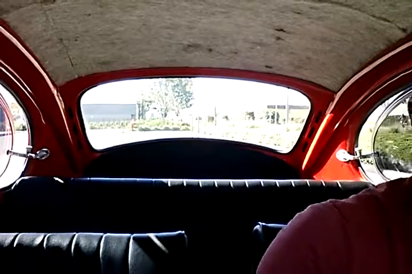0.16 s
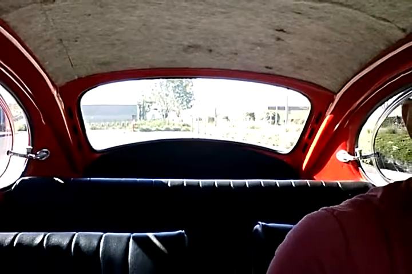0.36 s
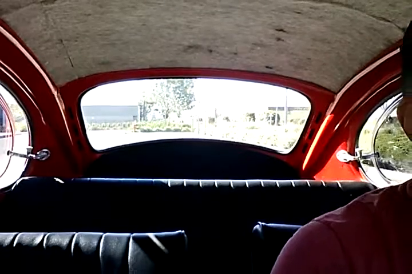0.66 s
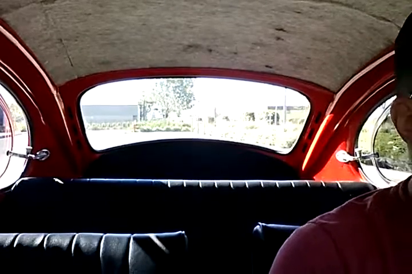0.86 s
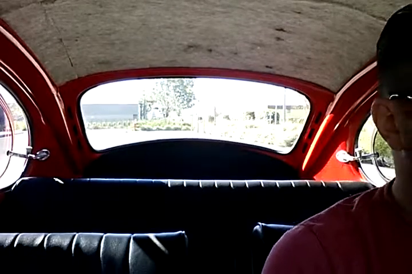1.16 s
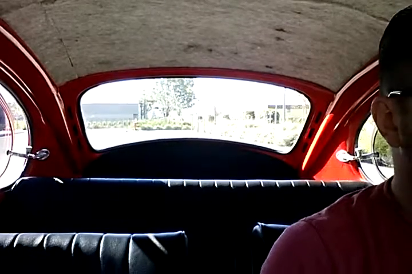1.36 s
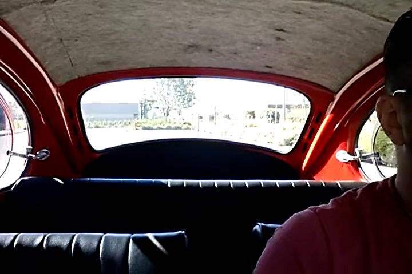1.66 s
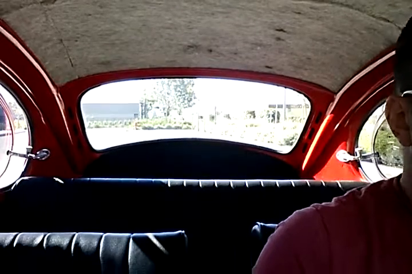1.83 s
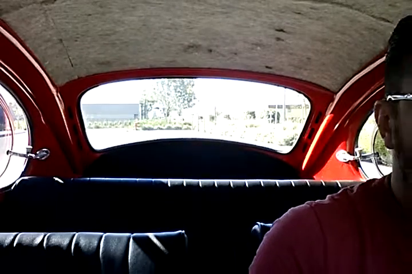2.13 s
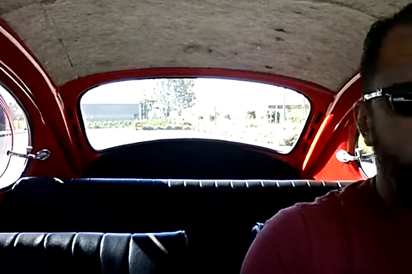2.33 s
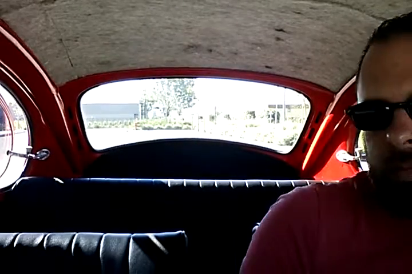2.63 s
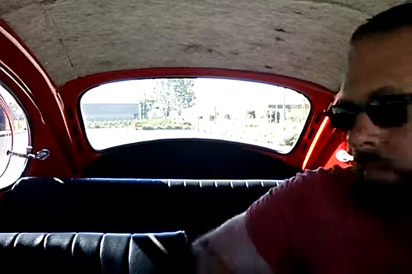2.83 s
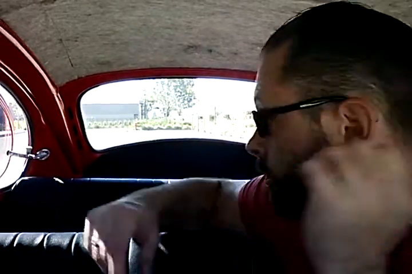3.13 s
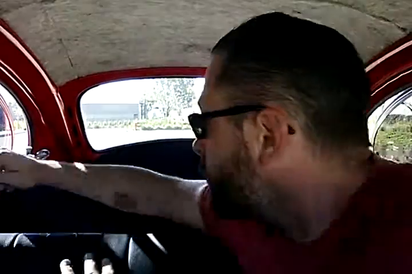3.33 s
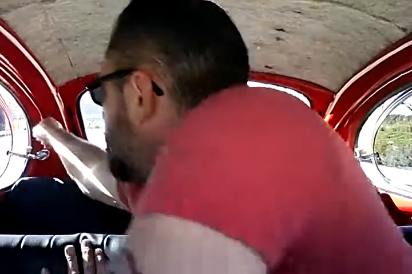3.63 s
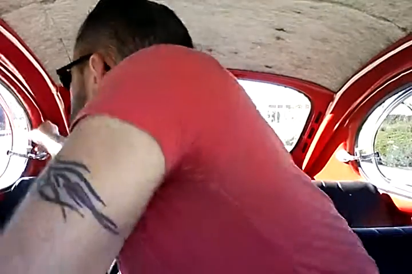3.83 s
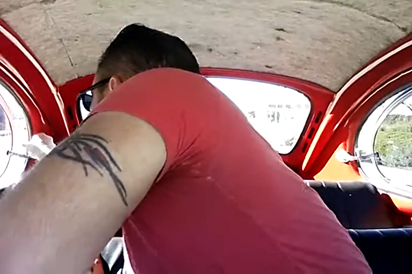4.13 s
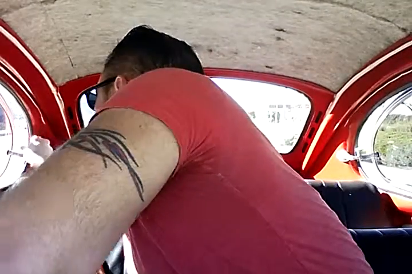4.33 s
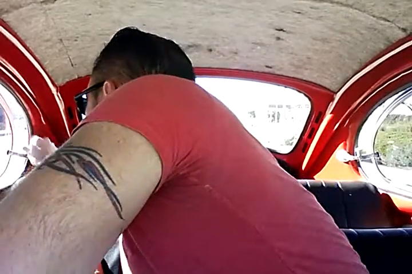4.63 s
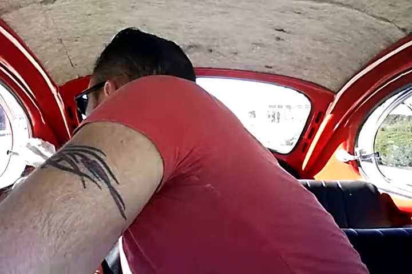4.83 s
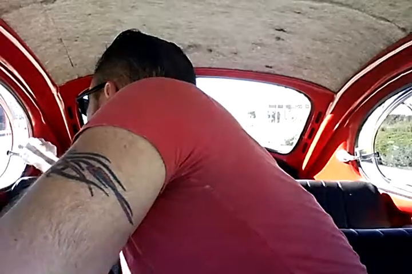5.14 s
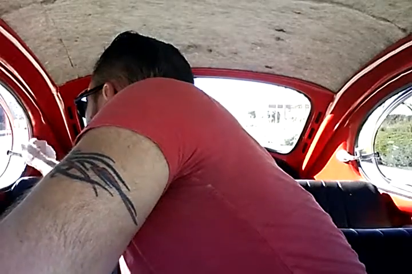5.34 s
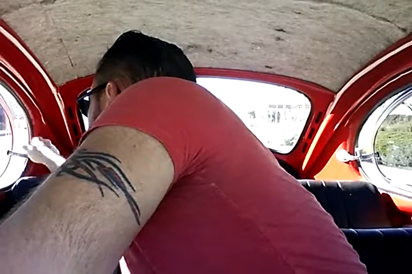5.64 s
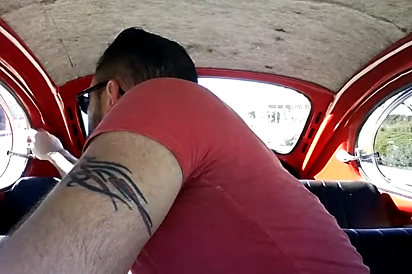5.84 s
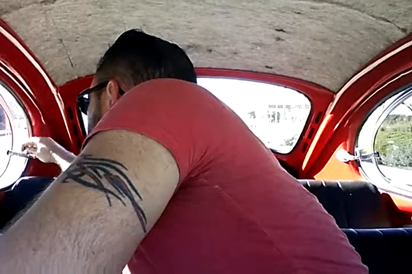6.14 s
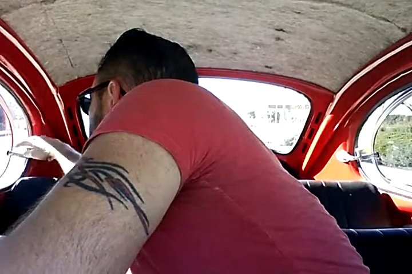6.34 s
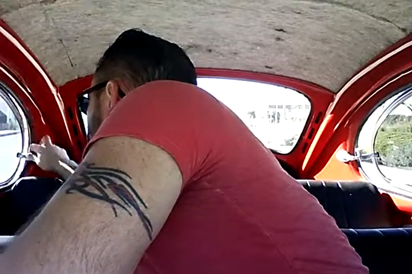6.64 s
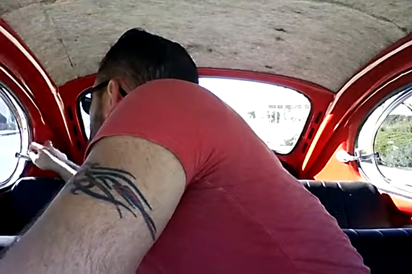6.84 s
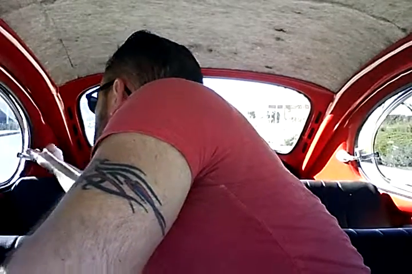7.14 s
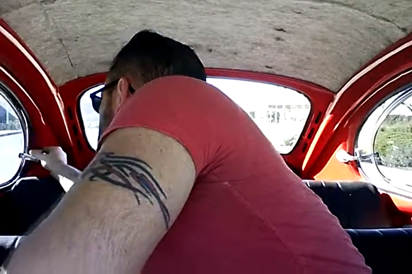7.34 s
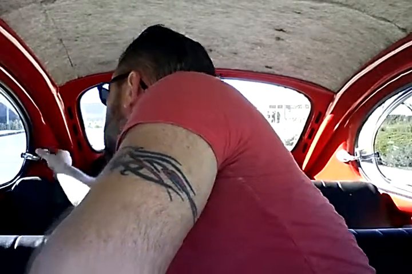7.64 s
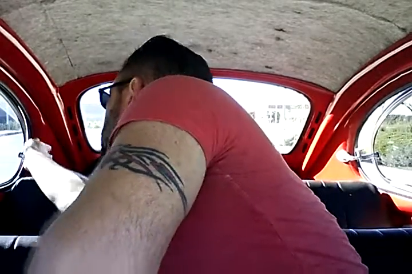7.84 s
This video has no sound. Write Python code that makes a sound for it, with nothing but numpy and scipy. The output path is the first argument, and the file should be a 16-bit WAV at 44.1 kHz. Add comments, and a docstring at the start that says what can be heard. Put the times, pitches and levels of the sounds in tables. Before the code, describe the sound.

Heard from the front seats of a small old car, an air-cooled engine idles slowly and unevenly behind, booming with clatter and tinny rattle. A seat belt clinks lightly, then jangles as the occupant twists around; vinyl squeaks and crunches, cloth hisses, and heavy blows hit the seat back. Finally a stiff rear window catch grinds, knocks and snaps.

```python
"""From the front seats of an old car with its engine idling: an air-cooled flat-four turns slowly behind the cabin,
its uneven firings filtered into a boom, with shaped noise for clatter, tin rattle and panel drone over faint hiss.
Fine treble hiss swells now and again, most at 2.6 to 3.4 s. A seat belt clinks from 0.7 s, in noise bursts rung
through steel; from 2 s come squeaks of gliding sines, crunching vinyl and seat-back blows of decaying sines.
From 5 s the stiff latch of a rear side window grinds and snaps, with knocks in the panel and pane."""
import sys
import numpy as np
from scipy import signal
from scipy.fft import rfft, irfft
from scipy.io import wavfile
from scipy.ndimage import uniform_filter1d, map_coordinates

SR = 44100
rng = np.random.default_rng(int(sys.argv[2]) if len(sys.argv) > 2 else 0)


def transcribe(signal):
    """Save signal, clipped to [-1, 1], as a 16-bit WAV file at the path in sys.argv[1]."""
    frames = np.atleast_2d(signal).T
    limited = np.clip(frames, -1, 1)
    pcm = np.round(limited * 32767).astype(np.int16)
    wavfile.write(sys.argv[1], SR, pcm)


N = 351918
TIME = np.arange(N) / SR

# Colour of steel clinking. Each row: frequency in Hz, relative level in dB.
CLINK_COLOUR = [(2650, -15), (4500, 0), (4770, 1), (5560, 3), (6770, 3.5), (8550, 3.5), (10800, 2),
                (12700, -2), (15100, -4.5), (16000, -6.5)]
# Colour of the duller clack of fittings. Each row: frequency in Hz, relative level in dB.
CLACK_COLOUR = [(200, -57.5), (500, -17.5), (850, 8.5), (1200, -3.5), (1700, 9), (2300, 6), (3200, 10),
                (4000, 0), (5000, -10.5), (7000, -21.5), (16000, -65)]
# Colour of crunching vinyl. Each row: frequency in Hz, relative level in dB.
CRUNCH_COLOUR = [(300, -25), (600, -18), (950, 8), (1400, 4.5), (2000, -1), (3200, -2.5), (4200, -4),
                 (7000, -43), (16000, -79)]
# Colour of the treble hiss, steady and swelling. Each row: frequency in Hz, relative level in dB.
HISS_COLOUR = [(2650, -55.5), (4500, -16.5), (5530, -8.5), (7260, -0.5), (8690, -0.5), (12900, 2),
               (14900, 2.5), (16000, -8.5)]
# Resonances of the cabin and its panels. Each row: centre in Hz, width in Hz, lift in dB.
CABIN_MODES = [(126, 12.9, 2), (159, 20, 3.5), (282.9, 9, 11), (409.4, 10, -1), (530.2, 27, 8.5),
               (695.3, 35, 8.5), (810, 23, 9), (979, 12, 6.5), (1200, 40, 3.5), (2220, 51, 11.5),
               (2473, 77, 5.5)]
# Resonances of the small steel fittings. Each row: centre in Hz, width in Hz, lift in dB.
STEEL_MODES = [(1200, 210, 11.5), (1598, 160, 5.5), (2700, 81, 6), (2910, 69, 7.5), (3344, 71, 2.5),
               (3786, 250, 6), (5570, 630, 1.5), (7359, 87, 0.5), (8550, 190, 2.5), (11680, 400, 3)]


def undb(db):
    """Decibels to gain."""
    return 10 ** (np.asarray(db) / 20)


def unit(x):
    """Scale to rms 1."""
    return x / np.sqrt(np.mean(x ** 2))


def curve(rows):
    """The second column of a table against time, joined by straight lines."""
    seconds, values = np.transpose(rows)
    return np.interp(TIME, seconds, values)


def noise():
    """White noise of rms 1."""
    return rng.standard_normal(N)


def walk(rate, size=N):
    """Smooth random drift of rms 1 that changes about rate times a second."""
    hold = max(int(SR / rate), 1)
    steps = np.repeat(rng.standard_normal(size // hold + 1), hold)
    return unit(uniform_filter1d(steps, hold)[:size])


def fade(age, t60):
    """Exponential decay by 60 dB in t60, in the unit of age."""
    return np.exp(-np.log(1000) * age / t60)


def body(x, spectrum, modes=(), size=8192):
    """Ring x through a causal response of unit energy: a broad spectrum with resonances on it."""
    f = np.arange(size // 2 + 1) * SR / size + 1
    hz, db = np.transpose(spectrum)
    db = np.interp(np.log(f), np.log(hz), db)
    for centre, width, lift_db in modes:
        db = db + lift_db / (1 + (2 * (f - centre) / width) ** 2)
    # the folded cepstrum gives minimum phase: the ring starts at once
    cepstrum = irfft(np.log(undb(db)))[:size // 2]
    cepstrum[0] = 0
    response = irfft(np.exp(rfft(2 * cepstrum, size)))
    return signal.fftconvolve(x, response / np.linalg.norm(response))[:len(x)]


def patchy(x, depth_db, rate, width_hz, size=512):
    """Parts ring in turn: each narrow band of x swells and fades on its own, about rate times a second."""
    overlap = size - size // 4
    f, t, bands = signal.stft(x, SR, nperseg=size, noverlap=overlap)
    chance = rng.standard_normal((int(f[-1] / width_hz) + 2, int(t[-1] * rate) + 2))
    grid = np.meshgrid(f / width_hz, t * rate, indexing="ij")
    swell = unit(map_coordinates(chance, grid, order=1))
    _, mixed = signal.istft(bands * undb(depth_db * swell), SR, nperseg=size, noverlap=overlap)
    return unit(mixed[:len(x)])


def strikes(times, levels_db, spectrum, modes, rise, t60, tail_db, tail_t60, crack=0.24, chatter_db=3):
    """Each contact cracks, chatters briefly, favours its own resonances and leaves dense reflections in the cabin."""
    out, age = np.zeros(2 * N), TIME[:SR // 3]
    decay = fade(age, t60) + undb(tail_db) * fade(age, tail_t60)
    shape = (1 - np.exp(-age / rise)) * decay
    shape = shape / shape.max() * (1 + crack * fade(age, 0.0028))
    for s, db in zip(times, levels_db):
        force = patchy(rng.standard_normal(len(age)), depth_db=3.2, rate=35, width_hz=220)
        force = unit(force * undb(chatter_db * walk(700, size=len(age))))
        start = int(s * SR)
        out[start:start + len(age)] += undb(db) * body(force * shape, spectrum, modes, size=4096)
    return out[:N]


def swells(rows, attack_share, slope_db_per_s, release_t60, tail_db, tail_t60):
    """Gain of drawn-out sounds: each rises, gains or loses level steadily, stops and leaves a faint tail."""
    power, age = np.zeros(2 * N), TIME[:2 * SR]
    for s, length, db in rows:
        start = int(s * SR)
        after = np.maximum(age - length, 0)
        attack = np.minimum(age / (attack_share * length), 1)
        hold = attack * undb(db + slope_db_per_s * (age - after))
        release = fade(after, release_t60) + undb(tail_db) * fade(after, tail_t60)
        power[start:start + len(age)] += (hold * release) ** 2
    return np.sqrt(power[:N])


def reflections(x, wet_db, t60):
    """Add the short, dense echo of the glass and steel shell."""
    tail = (noise() * fade(TIME, t60))[:SR // 3]
    return x + undb(wet_db) * signal.fftconvolve(x, tail / np.linalg.norm(tail))[:N]


def hiss(level_db=-80.5):
    """A faint, even hiss in the treble: steady filtered noise."""
    return body(noise(), HISS_COLOUR) * undb(level_db)


def firing_pulses(firings, scatter_db=3.0, misfire_db=-13.5):
    """One impulse a firing, with each cylinder's own strength, random scatter and stumbles."""
    # Each cylinder's strength in firing order, in dB before scatter.
    cylinder_db = np.array([1.5, -18, 3.5, -18.5])
    # The engine stumbles at the firings nearest these times, in seconds.
    misfires = [0.13, 0.66, 2.03, 2.18, 2.33, 3.54, 4.38, 5.14, 5.68, 6.75, 6.9, 7.28, 7.44, 7.51]
    count = firings.astype(int)
    at = np.flatnonzero(np.diff(count)) + 1
    strength_db = cylinder_db[count[at] % len(cylinder_db)]
    pulses = np.zeros(N)
    pulses[at] = undb(strength_db + scatter_db * rng.standard_normal(len(at)))
    for s in misfires:
        pulses[at[np.argmin(np.abs(at / SR - s))]] *= undb(misfire_db)
    return pulses


def engine(boom_trim_db=-1, clatter_trim_db=3.0, rattle_trim_db=1.0, drone_trim_db=1, shake_db=0.5, puff=0.27):
    """Two firings a turn, strong and weak in turn, boom in the shell; noise shaken with them excites the panels."""
    # Engine speed. Each row: time in seconds, crank turns per second.
    crank = [(0, 13.35), (1, 13.17), (3.5, 13.17), (4.8, 13.09), (7, 13.1), (8, 12.85)]
    # Course of boom, clatter, rattling tin and panel drone. Each row: time in seconds, level in dB before trim.
    boom_level, clatter_level = [(0, -34), (0.6, -33.5), (1.7, -30), (2.5, -32), (3.1, -31), (4.1, -30.5),
                                 (4.5, -35.5), (5.5, -30), (6.5, -27.5), (7.0, -33), (7.98, -29)], [(0.0, -37), (0.4, -36), (1.2, -37), (1.78, -34.5),
                                               (2.51, -41), (2.82, -34), (3.09, -40.5), (3.33, -33),
                                               (3.78, -40.5), (4.29, -41.5), (5.31, -35), (5.8, -33),
                                               (6.15, -35.5), (6.74, -39), (7.69, -39.5), (7.98, -38.5)]
    rattle_level, drone_level = [(0.0, -53.5), (0.82, -54), (1.24, -49), (2.22, -48.5), (2.36, -63),
                                 (2.62, -45.5), (2.8, -48), (3.02, -56), (3.44, -48), (4.42, -58),
                                 (5.67, -48), (6.24, -53.5), (6.51, -56), (6.87, -56), (7.56, -56),
                                 (7.98, -52)], [(0.0, -69), (1.2, -54), (2.27, -58.5), (2.98, -41.5),
                                                       (3.35, -45.5), (3.89, -56), (4.44, -58), (4.98, -43),
                                                       (6.0, -36.5), (6.29, -53), (6.87, -33),
                                                       (7.98, -44.5)]
    # Colours of the same four layers. Each row: frequency in Hz, relative level in dB.
    boom_colour, clatter_colour = [(12, -59), (28, -33), (40, -9.5), (52, 0.5), (64, 3.5), (80, 8.5),
                                   (95, -5), (116, -25), (160, -20.5), (230, -33.5), (400, -58.5),
                                   (2000, -120)], [(20, -27), (45, -11), (62, 4.5), (85, 3), (110, 1),
                                                    (170, 2), (300, -4), (510, -6.5), (600, -13),
                                                    (1000, -14.5), (1250, -18.5), (1400, -41),
                                                    (2500, -55.5), (5000, -43.5), (9000, -75.5)]
    rattle_colour, drone_colour = [(500, -64), (1250, 8), (1600, 4), (2500, 2.5), (3800, -4.5),
                                   (4600, -20.5), (5800, -18), (7300, -29.5), (10000, -53.5),
                                   (16000, -64.5)], [(150, -38), (310, -13.5), (388, 0.5), (460, -13.5),
                                                   (800, -40.5), (3000, -100)]

    firings = 2 * (np.cumsum(curve(crank)) / SR + 1.24)
    boom = unit(body(firing_pulses(firings), boom_colour))
    # valve gear and tin swell once a turn, with a puff after every firing
    turn_swell = undb(shake_db * np.cos(np.pi * firings - 1.2))
    shake = turn_swell * (1 + puff * fade(firings % 1, 2.0))  # this t60 is in firings
    gear = patchy(noise(), depth_db=4.2, rate=55, width_hz=110)
    tin = patchy(noise(), depth_db=3.8, rate=70, width_hz=200)
    clatter = body(unit(gear * shake * undb(1.4 * walk(40))), clatter_colour, CABIN_MODES)
    rattle = body(unit(tin * shake * undb(2.3 * walk(40))), rattle_colour, CABIN_MODES)
    drone = body(unit(gear * shake), drone_colour, CABIN_MODES)

    out = boom * undb(curve(boom_level) + boom_trim_db)
    out += clatter * undb(curve(clatter_level) + clatter_trim_db)
    out += rattle * undb(curve(rattle_level) + rattle_trim_db)
    return out + drone * undb(curve(drone_level) + drone_trim_db)


def hiss_swells(grain_db=-1.0, surge_db=2.36):
    """Swells of fine, uneven treble hiss, some like rubbing cloth, some trailing after clicks; each eases off."""
    # Swells of hiss. Each row: start in seconds, length in seconds, starting level in dB.
    hissing = [(0.02, 0.026, -68), (0.29, 0.05, -74), (0.585, 0.045, -68), (2.371, 0.013, -29),
               (2.44, 0.2, -62), (2.62, 0.78, -38), (3.505, 0.081, -48.5), (3.62, 0.37, -65),
               (4.04, 0.054, -67.5), (5.7, 0.33, -69.5), (6.28, 0.57, -73), (7.045, 0.1, -48),
               (7.5, 0.85, -69.5)]
    level = swells(hissing, attack_share=0.075, slope_db_per_s=-15.5, release_t60=0.076, tail_db=-21.5, tail_t60=1.2)
    unevenness = undb(grain_db * walk(170) + surge_db * walk(21))
    return body(unit(noise() * unevenness), HISS_COLOUR) * level


def seat_cover(crackle_db=4.5):
    """The vinyl creases and crunches under the shifting weight: crackling noise in short swells."""
    # Shifts of weight. Each row: start in seconds, length in seconds, starting level in dB.
    shifts = [(2.085, 0.075, -45), (2.66, 0.14, -42.5), (3.21, 0.14, -39.5)]
    level = swells(shifts, attack_share=0.3, slope_db_per_s=-2.5, release_t60=0.13, tail_db=-19.5, tail_t60=0.6)
    return body(unit(noise() * undb(crackle_db * walk(300))), CRUNCH_COLOUR) * level


def bumps(thud_trim_db=-2, knock_trim_db=-1, clack_trim_db=-2):
    """Soft, heavy blows ring the seat back as decaying sines, with noisy knocks and crunches from the panels."""
    # Blows on the seat and side panel. Each row: start in seconds, then thud, knock and clack levels
    # in dB before trim, thud t60 in seconds.
    blows = [(0.283, -53, -30, -54, 0.57), (3.258, -23.5, -15.5, -19, 1), (3.3, -18, -24, -23, 0.47),
             (3.347, -31, -24, -35, 0.62), (3.644, -51, -40, -53, 0.34), (3.686, -18, -25, -43, 0.39),
             (4.161, -14.5, -29, -52, 0.27), (6.674, -26.5, -19.5, -41, 0.2),
             (7.219, -32, -25.5, -60, 0.23)]
    # Modes of the seat back. Each row: frequency in Hz, relative level in dB, share of the thud's t60.
    seat_modes = [(79.3, -24, .7), (122.5, 3.5, 0.64), (170.6, -3.5, 0.69), (207, -11, 1.4),
                  (265, -5, 0.71), (310.4, -6.5, 0.44), (364, -0.5, 0.39)]
    # Colour of the panel knock. Each row: frequency in Hz, relative level in dB.
    panel_colour = [(120, -12.5), (260, 6.5), (370, -2), (520, 0.5), (700, -7.5), (1000, -13.5),
                    (1500, -24.5), (8000, -59)]
    thuds = np.zeros(N)
    for s, db, _, _, t60 in blows:
        heard = (TIME > s) & (TIME < s + 1)
        age = TIME[heard] - s
        soft_start = 1 - fade(age, 0.016)
        for k, (hz, mode_db, share) in enumerate(seat_modes):
            ring = np.sin(2 * np.pi * hz * age) * fade(age, t60 * share) * soft_start
            thuds[heard] += (-1) ** k * undb(db + mode_db + thud_trim_db) * ring
    s, _, knock, clack, _ = np.transpose(blows)
    low = strikes(s, knock + knock_trim_db, panel_colour, (), rise=0.0013, t60=0.22, tail_db=-24, tail_t60=0.19)
    mid = strikes(s, clack + clack_trim_db, CRUNCH_COLOUR, (), rise=0.0023, t60=0.093, tail_db=-18, tail_t60=0.17)
    return thuds + low + mid


def squeaks(flutter=0.66):
    """Dry surfaces stick and slip: short, rough, gliding tones with up to three partials, echoed by the cabin."""
    # Each row: start in seconds, length in seconds, start and end pitch in Hz, level in dB midway between
    # the first two partials, step from partial to partial in dB, roughness as rms share of the pitch.
    glides = [(2.144, 0.051, 1113, 1290, -35, -17.5, 0.09), (2.363, 0.066, 1337, 1427, -37.5, -11, 0.11),
              (2.36, 0.061, 3360, 3520, -46.5, -18, 0.01), (2.655, 0.065, 1385, 1614, -39.5, -6.5, 0),
              (2.697, 0.03, 1627, 1647, -28, -5.5, 0.2), (3.927, 0.19, 1016, 1014, -53.5, -23, 0.06),
              (7.046, 0.02, 11700, 12200, -27.5, -11, 0), (7.27, 0.024, 1250, 1563, -33, -14.5, 0.05)]
    out = np.zeros(N)
    for s, length, start_hz, end_hz, db, step_db, rough in glides:
        span = slice(int(s * SR), int((s + length) * SR))
        progress = np.linspace(0, 1, span.stop - span.start)
        hz = (start_hz + (end_hz - start_hz) * progress) * (1 + rough * walk(900)[span])
        phase = 2 * np.pi * np.cumsum(hz) / SR
        partials = [k for k in range(1, 4) if k * end_hz < SR / 2]
        tone = sum(undb(step_db * (k - 1.5)) * np.sin(k * phase) for k in partials)
        swell = np.sin(np.pi * progress) * (1 + flutter * walk(400)[span])
        out[span] += undb(db) * tone * swell
    return reflections(out, wet_db=-5.5, t60=0.15)


def belt(clink_trim_db=-2, clack_trim_db=-5):
    """The steel tongue leaves its buckle and clinks against the fittings: noise bursts rung through steel."""
    # Contacts of the belt hardware. Each row: time in seconds, clink and clack levels in dB before trim.
    contacts = [(0.7058, -42.5, -69), (1.1836, -31.5, -37), (1.2149, -34, -30), (1.4614, -57, -36),
                (2.1551, -20.5, -21), (2.1694, -43, -33), (2.198, -37, -36), (2.2238, -26, -48),
                (2.2368, -18.5, -25.5), (2.7112, -20.5, -19), (2.729, -25.5, -51.5), (2.752, -27.5, -27),
                (2.8303, -31, -22), (2.8867, -27, -23.5), (2.9113, -28, -21.5), (2.9213, -14, -21),
                (3.1985, -41.5, -37), (3.227, -53, -31.5), (3.245, -34.5, -30.5), (3.262, -16.5, -43),
                (3.4555, -41, -43)]
    s, clink, clack = np.transpose(contacts)
    high = strikes(s, clink + clink_trim_db, CLINK_COLOUR, STEEL_MODES,
                   rise=.0008, t60=0.062, tail_db=-9.5, tail_t60=0.19, crack=0.43)
    mid = strikes(s, clack + clack_trim_db, CLACK_COLOUR, STEEL_MODES,
                  rise=0.0045, t60=0.04, tail_db=-15.0, tail_t60=0.22, crack=1.0)
    return high + mid


def latch(clink_trim_db=0, clack_trim_db=1, knock_trim_db=-1):
    """The window catch grinds, snaps and chatters in steel; the pane and side panel knock with each contact."""
    # Contacts of the catch. Each row: time in seconds, then clink, clack and knock levels in dB before trim.
    snaps = [(5.671, -31, -34.5, -27.5), (5.8045, -65, -43, -50), (5.8438, -54, -31, -19),
             (5.929, -63, -34.5, -37), (6.0221, -79, -36, -24), (6.3451, -79, -41, -22),
             (6.3648, -73, -39, -25), (6.4604, -76, -43, -34), (6.5298, -62, -37.5, -26.5),
             (6.6253, -62, -30, -25), (6.6455, -39.5, -22, -20), (6.7417, -68, -42.5, -48),
             (6.8769, -25.5, -23, -14.5), (6.986, -53, -54, -25), (7.169, -50.5, -55, -41),
             (7.725, -41, -36.5, -45), (7.8003, -59.5, -42, -29.5), (7.8927, -57, -41.5, -28),
             (7.9051, -33.5, -29, -20.5)]
    # Finger pushes that grind the stiff catch. Each row: start in seconds, length in seconds, starting level in dB.
    pushes = [(5.25, 0.4, -53), (5.8, 0.19, -53), (6.26, 0.44, -47.5), (7.86, 0.077, -47)]
    # Colours of the pane and panel knock, and of the grinding. Each row: frequency in Hz, relative level in dB.
    knock_colour, creak_colour = [(120, -6), (260, -3.5), (390, 6), (520, -5.5), (750, -10), (1100, -10.5),
                                  (2000, -57), (8000, -89)], [(500, -33), (1100, -4), (1700, 4.5), (2200, 8), (2700, -4),
                                                 (3200, 2), (3900, -14), (4800, -24), (8000, -48),
                                                 (16000, -65)]
    s, clink, clack, knock = np.transpose(snaps)
    high = strikes(s, clink + clink_trim_db, CLINK_COLOUR, STEEL_MODES,
                   rise=0.0079, t60=0.053, tail_db=-33.5, tail_t60=0.41)
    mid = strikes(s, clack + clack_trim_db, CLACK_COLOUR, STEEL_MODES,
                  rise=0.0012, t60=0.086, tail_db=-22.5, tail_t60=0.18)
    low = strikes(s, knock + knock_trim_db, knock_colour, CABIN_MODES,
                  rise=0.0016, t60=0.1, tail_db=-21.0, tail_t60=0.17)
    slips = patchy(noise(), depth_db=4.5, rate=90, width_hz=400)
    effort = swells(pushes, attack_share=0.067, slope_db_per_s=3, release_t60=0.16, tail_db=-8.5, tail_t60=2.9)
    return high + mid + low + body(slips, creak_colour, STEEL_MODES) * effort


def scene():
    """Everything sounds inside the one small cabin, on one channel."""
    background = hiss() + engine()
    movements = hiss_swells() + seat_cover() + bumps() + squeaks()
    return (background + movements + belt() + latch())[None]


def record(dry, top_hz=15900):
    """The recorder cuts off the top of the treble steeply."""
    low_pass = signal.ellip(8, .2, 70, top_hz, fs=SR, output="sos")
    return signal.sosfilt(low_pass, dry)


dry = scene()
out = record(dry)
transcribe(out)
```